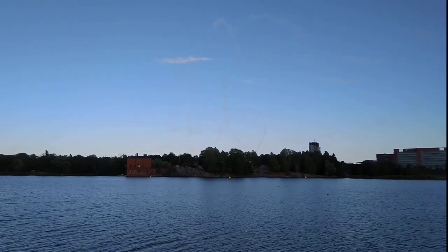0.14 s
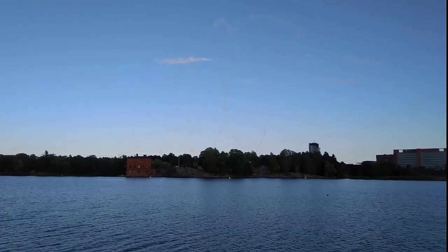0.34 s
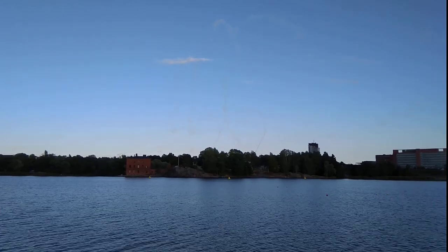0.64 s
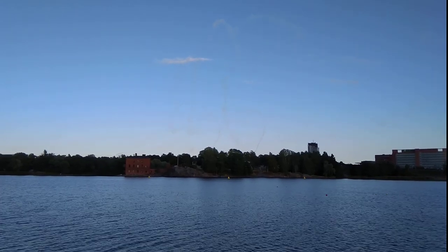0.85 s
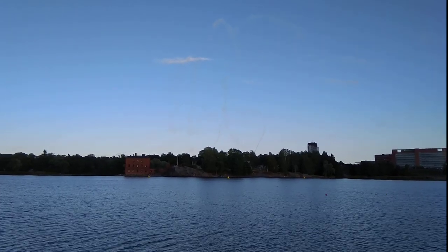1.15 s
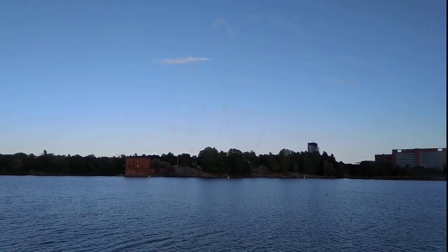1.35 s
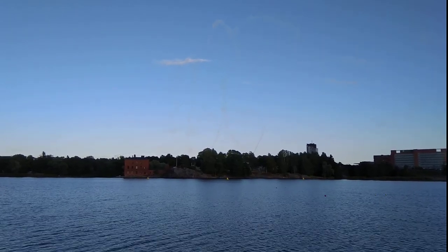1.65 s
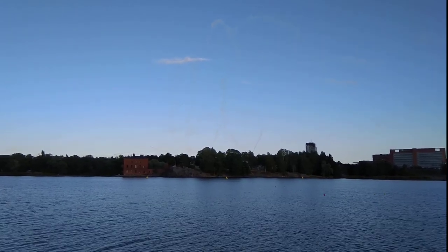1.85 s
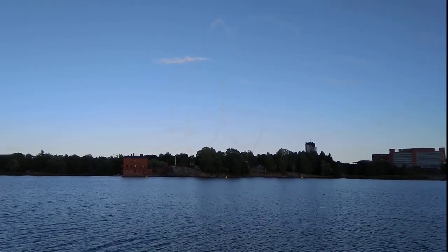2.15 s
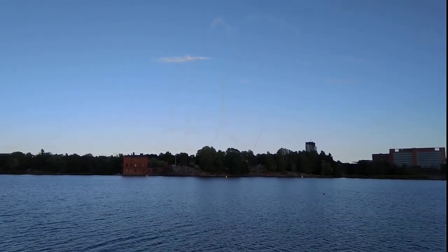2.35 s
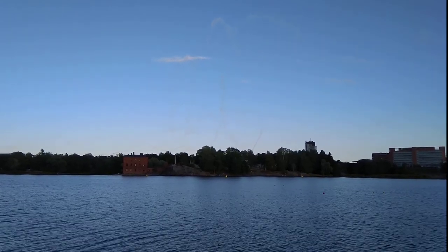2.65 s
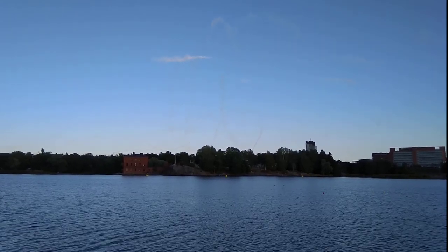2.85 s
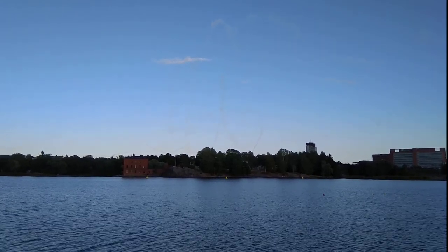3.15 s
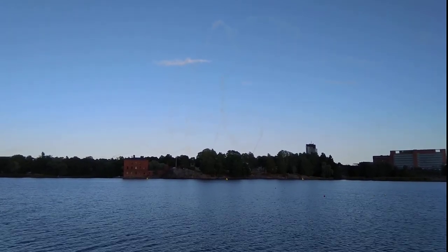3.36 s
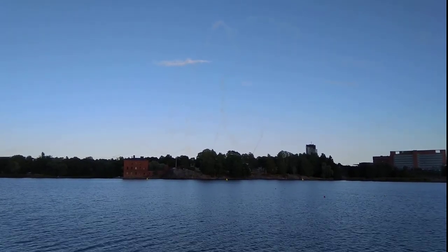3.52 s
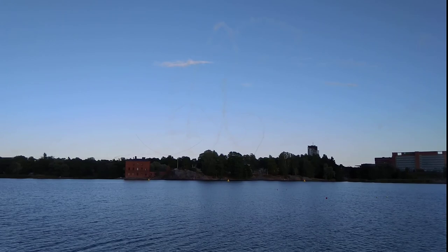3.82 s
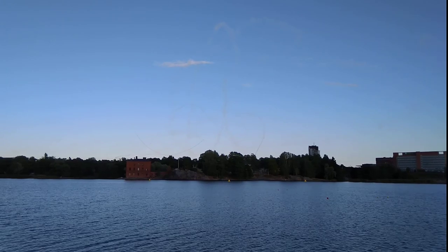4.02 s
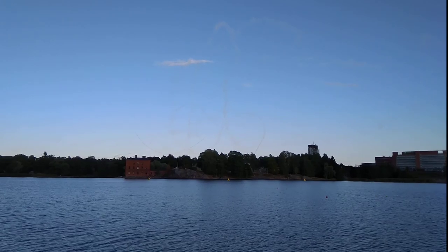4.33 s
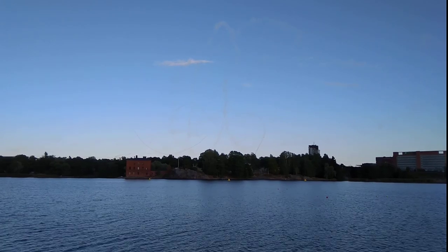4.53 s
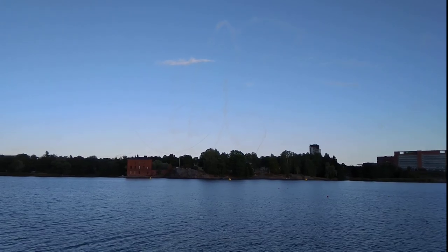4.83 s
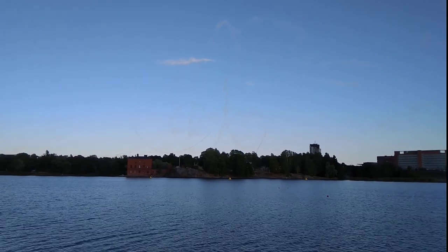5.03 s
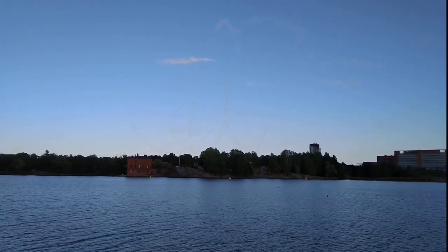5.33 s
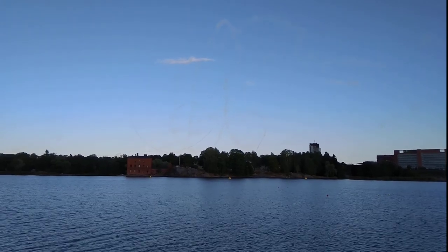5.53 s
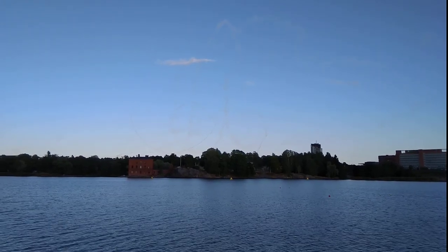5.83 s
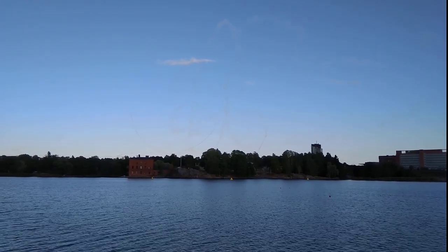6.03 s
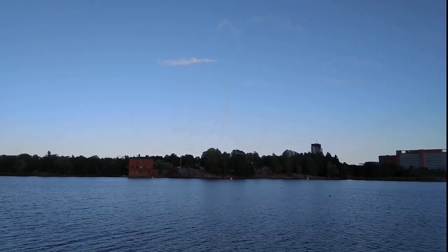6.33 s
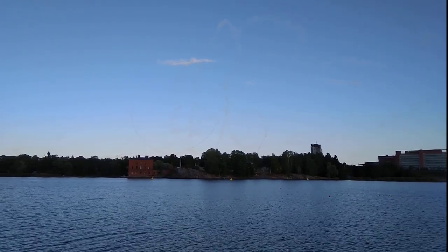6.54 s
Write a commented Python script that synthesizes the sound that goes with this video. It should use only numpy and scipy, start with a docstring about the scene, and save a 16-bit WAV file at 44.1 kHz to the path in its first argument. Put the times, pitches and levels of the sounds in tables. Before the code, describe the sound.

Small waves lap close by on a stony lake shore. For the first half second a fizzing wash swells and drains, with a quick cluster of sharp little slaps against the stones. Lighter laps and bubbly gurgles follow, with a round glug at about 1.4 seconds. From 1.8 to 3 seconds little waves fold over and splash again, the sharpest slap landing near 2 seconds. A few softer slaps come around 3.4 seconds, then the water calms. Tiny drips tick near 4 seconds, followed by two clear, hollow glugs at about 4.3 seconds. Another small splash arrives near 5 seconds, with bubbling around 5.5 seconds, and weak laps and trickles continue until the end at about 6.7 seconds. Underneath, a faint low rumble of traffic and a machine hum carry steadily from a town across the water.

```python
"""Small waves on a stony lake shore

A wash drains away, then weaker laps follow, each a swarm of tiny ringing bubbles and fizzing spray.
Crests slap the stones, little waves fold over, and trapped air gurgles and glugs in the gaps.
A distant town rumbles and hums across the water."""
import sys
import numpy as np
from scipy import signal
from scipy.fft import rfft, irfft, next_fast_len
from scipy.io import wavfile
from scipy.ndimage import uniform_filter1d, map_coordinates

SR = 44100
rng = np.random.default_rng(int(sys.argv[2]) if len(sys.argv) > 2 else 0)


def to_wav(s):
    """Save 16-bit WAV."""
    ch = np.atleast_2d(s).T  # columns
    pcm = np.round(np.clip(ch, -1, 1) * 32767)  # PCM
    wavfile.write(sys.argv[1], SR, pcm.astype(np.int16))


N = 294588


def amp(db):
    """Turn decibels (dB) into a number to multiply a sound by."""
    return 10 ** (np.asarray(db) / 20)


def unit(x):
    """Scale a sound to an average (rms) level of 1."""
    return x / np.sqrt(np.mean(x ** 2) + 1e-20)


def even(swarm):
    """Hold a sound's level near 1, smoothing out its slow ups and downs."""
    return swarm / np.sqrt(np.abs(uniform_filter1d(swarm ** 2, size=4000)) + 1e-6)


def curve(rows):
    """Join (seconds, value) points with straight lines, one value per sample."""
    return np.interp(np.arange(N) / SR, *np.transpose(rows))


def wobble(rate):
    """A smooth random curve through `rate` points a second."""
    return map_coordinates(rng.standard_normal(int(N * rate / SR) + 4), [np.arange(N) * rate / SR])


def swell(age, rise_s):
    """A rounded loudness shape that reaches 1 after rise_s seconds, then dies."""
    u = np.maximum(age, 0) / rise_s
    return (u * np.exp(1 - u)) ** 2


def filtered(x, response):
    """Multiply each frequency in x by response(hz)."""
    size = next_fast_len(N + SR // 2)
    return irfft(rfft(x, size) * response(np.fft.rfftfreq(size, 1 / SR)), size)[:N]


def coloured(x, points):
    """Shape the tone of x with (Hz, dB) points and bring it to level 1."""
    f, db = np.transpose(points)
    return unit(filtered(x, lambda hz: amp(np.interp(np.log(hz + 1), np.log(f), db))))


def patchy(x, depth_db):
    """Make small random patches of pitch and time louder or softer."""
    spectrum = signal.stft(x, nperseg=1024)[2]
    patches = uniform_filter1d(rng.standard_normal(spectrum.shape), size=5, axis=0)
    patches = uniform_filter1d(patches, size=7, axis=1)
    return signal.istft(spectrum * amp(depth_db * unit(patches)), nperseg=1024)[1][:N]


def stones(x, echo_db, echo_s):
    """Nearby stones add a short, dense echo that fades by 60 dB in echo_s seconds."""
    t = np.arange(SR // 8) / SR
    tail = rng.standard_normal(len(t)) * amp(-60 * t / echo_s) * (1 - np.exp(-t / 0.0031))
    return x + amp(echo_db) * signal.fftconvolve(x, tail / np.linalg.norm(tail))[:N]


def bubbles(starts, hz, cycles, spread_db, onset, size):
    """Each bubble rings for `size` samples: a fading tone that rises slightly in pitch."""
    age = np.arange(size) / SR * hz[:, None] / cycles  # reaches 1 after `cycles` vibrations
    strength = amp(spread_db * np.minimum(rng.exponential(size=(len(hz), 1)), 4))
    sign = rng.choice([-1, 1], (len(hz), 1))
    tone = np.sin(2 * np.pi * cycles * age * (1 + 0.011 * age))
    ring = tone * np.exp(-age) * (1 - np.exp(-age / onset)) ** 2
    places = starts[:, None] + np.arange(size)
    return unit(np.bincount(places.ravel(), (sign * strength * ring).ravel(), N + size)[:N])


def froth(low_hz, high_hz, cycles, spread_db, count, size):
    """A steady swarm of small bubbles and droplets within a range of pitches."""
    hz = low_hz * (high_hz / low_hz) ** rng.random(count)
    return bubbles(rng.integers(0, N, count), hz, cycles, spread_db, onset=0.062, size=size)


def flow():
    """Strength in dB of splash, wash and fizz: each lap swells and drains, over the fading foam."""
    # Foam left by the first wave. Each row: time in seconds, level in dB.
    foam = [(0.0, -40.5), (0.57, -46), (2.77, -52.5), (4.3, -59), (5.39, -63), (5.64, -67), (6.68, -68.5)]
    # The foam's splash, wash and fizz. Each row: dB above the foam, extra dB lost per dB it has faded.
    foam_sounds = [(-21, 1.5), (3, 0.5), (2, 0.16)]
    # Little waves running up the stones. Each row: crest time, run-up time and drain time in seconds,
    # then strength of splash, wash and fizz in dB.
    waves = [(0.03, 0.077, 0.22, -46, -35, -42), (0.16, 0.06, 0.13, -42.5, -31.5, -43),
             (0.375, 0.018, 0.086, -45, -35.5, -50), (0.539, 0.044, 0.07, -72, -41, -55),
             (0.72, 0.1, 0.15, -51.5, -40, -58), (1.375, 0.09, 0.075, -50, -38.5, -47.5),
             (1.77, 0.071, 0.071, -46.5, -46, -70), (1.88, 0.064, 0.15, -43.5, -42.5, -49),
             (2.07, 0.028, 0.14, -43.5, -44, -57.5), (2.39, 0.055, 0.094, -43.5, -40.5, -48),
             (2.51, 0.052, 0.068, -44.5, -44.5, -67), (2.72, 0.14, 0.2, -74, -46.5, -54),
             (2.89, 0.055, 0.069, -41.5, -41, -47), (3.08, 0.13, 0.51, -52, -47, -51.5),
             (3.419, 0.13, 0.13, -49.5, -49, -54), (3.62, 0.049, 0.088, -51, -52, -71),
             (3.94, 0.084, 0.1, -79, -43, -54.5), (4.0, 0.043, 0.046, -50, -61, -51.5),
             (4.19, 0.073, 0.19, -50.5, -46, -49), (4.755, 0.05, 0.094, -61, -52, -56.5),
             (4.97, 0.059, 0.086, -45, -46.5, -47), (5.12, 0.03, 0.077, -70, -51.5, -70),
             (5.38, 0.084, 0.14, -53.5, -49.5, -56.5), (5.75, 0.076, 0.1, -60.5, -59.5, -65),
             (5.96, 0.074, 0.062, -49.5, -50.5, -51.5), (6.21, 0.033, 0.08, -57, -85, -61.5),
             (6.35, 0.034, 0.16, -59, -66, -61), (6.49, 0.06, 0.097, -54.5, -56, -56)]
    t = np.arange(N) / SR
    foam_db = curve(foam)
    faded_db = np.maximum(-54 - foam_db, 0)  # -54 dB is a full blanket of foam
    power = np.array([amp(foam_db + db - loss * faded_db) ** 2 for db, loss in foam_sounds])
    for crest, run_up, drain, *levels_db in waves:
        rising = (np.minimum(t - crest, 0) / run_up) ** 2
        draining = (np.maximum(t - crest, 0) / drain) ** 1.1  # the last water drains fastest
        power += np.outer(amp(levels_db), np.exp(-rising - draining)) ** 2
    return 10 * np.log10(power)


def laps(splash_db, wash_db, fizz_db):
    """Strong water is a dense froth; as it slackens, single ringing bubbles take over."""
    # The tone of four layers of water. Each row: frequency in Hz, boost or cut in dB.
    splash_tone = [(250, -68), (600, -19), (1130, -16), (1450, 5), (2000, 3), (2450, 9), (3200, -36),
                   (6000, -55)]
    wash_tone = [(1000, -50), (1750, -0.5), (2000, 0), (2400, -2.5), (3100, 2), (4300, 3), (6000, -9.5),
                 (9000, -62)]
    fizz_tone = [(2000, -23), (3400, -10.5), (4200, -3.5), (4600, -2.5), (5400, -5), (6600, -5),
                 (8200, -19), (12000, -36)]
    spray_tone = [(4000, -15), (7000, 1.5), (8500, -1.5), (11000, -2.5), (15800, -4.5)]
    # How the finest spray thins as foam bursts. Each row: time in seconds, loss in dB.
    spray_loss = [(0, 3.5), (2.8, -0.5), (3.7, 4), (4.25, 2), (5.0, 8.5), (6.3, 4.5)]

    def blend(tone, thick, thin, froth_db):
        """Mix froth and single bubbles, half and half when the wash is at froth_db."""
        share = 1 / (1 + amp(froth_db - wash_db) ** 2)
        dense = even(coloured(patchy(thick, depth_db=2), tone))
        sparse = even(coloured(patchy(stones(thin, echo_db=4, echo_s=0.11), depth_db=3.8), tone))
        return np.sqrt(share) * dense + np.sqrt(1 - share) * sparse

    thick = froth(290, 3170, cycles=4.5, spread_db=5, count=9000, size=700)
    thin = froth(293.6, 3055, cycles=15, spread_db=3, count=1800, size=1500)
    splash = blend(splash_tone, thick, thin, froth_db=-45)
    thick = froth(2070, 3930, cycles=1.28, spread_db=3, count=20000, size=160)
    thin = froth(1868, 5110, cycles=12, spread_db=2.8, count=3500, size=1000)
    wash = blend(wash_tone, thick, thin, froth_db=-53)
    fizz = froth(2980, 9240, cycles=2.4, spread_db=4, count=12000, size=100)
    fizz += amp(8) * rng.standard_normal(N)
    spray = froth(9000, 14200, cycles=1, spread_db=5, count=3000, size=60)
    spray += amp(8.5) * rng.standard_normal(N)
    spray_db = -58.5 + 0.98 * (fizz_db + 51) - curve(spray_loss) + 0.85 * wobble(30)
    return (amp(splash_db) * splash + amp(wash_db - 1.5) * wash
            + amp(fizz_db - 4) * even(coloured(patchy(fizz, depth_db=1.5), fizz_tone))
            + amp(spray_db) * coloured(patchy(spray, depth_db=1.5), spray_tone))


def hollows(water, wash_db, depth_db=5):
    """Ebbing water bares hollows between the stones: some colour its tone steadily, others shift."""
    # The steady hollows. Each row: pitch in Hz, half width in Hz, boost or cut in dB.
    cavities = [(1310, 56, 5), (1840, 124, -3.5), (2000, 55, 3.5)]

    def colour(hz):
        return amp(sum(db * np.exp(-((hz - centre) / width) ** 2) for centre, width, db in cavities))

    bare = 1 / (1 + amp(wash_db + 45) ** 2)  # half bare when the wash is at -45 dB
    patch_gain = np.exp((depth_db * np.log(10) / 20) ** 2)  # level that the patches add on average
    return (1 - bare) * water + bare * patchy(filtered(water, colour), depth_db) / patch_gain


def bubbling(start, length, pitch_hz, scatter, count):
    """A run of softly starting bubbles, scattered around a pitch that sinks a little."""
    progress = (np.arange(count) + rng.random(count)) / count
    starts = np.clip((start + length * progress) * SR, 0, N - 1).astype(int)
    hz = pitch_hz * (1 - 0.019 * (progress - 0.5)) * np.exp(scatter * rng.standard_normal(count))
    return even(bubbles(starts, hz, cycles=3.6, spread_db=2.2, onset=0.7, size=1800))


def gurgle(fill_s=0.027, empty_s=0.085):
    """Each gap between stones fills and empties, bubbling at its own pitch, over an unbroken trickle whose
    level wavers."""
    # Water filling a gap. Each row: start and length in seconds, level in dB, pitch in Hz.
    fills = [(0.0, 0.14, -48, 801), (0.534, 0.06, -47, 1126), (0.703, 0.26, -58.5, 820),
             (1.14, 0.12, -43.5, 860), (1.333, 0.22, -46, 846), (1.379, 0.2, -46, 727),
             (1.851, 0.14, -47.5, 1220), (2.001, 0.22, -45.5, 774), (2.183, 0.37, -44.5, 761),
             (2.56, 0.12, -48, 905), (2.811, 0.19, -46, 770), (2.939, 0.2, -47.5, 1025),
             (3.03, 0.25, -47.5, 725), (3.533, 0.18, -54.5, 1064), (3.686, 0.19, -56, 916),
             (3.951, 0.24, -55, 1008), (4.221, 0.32, -51, 790), (4.624, 0.3, -52.5, 884),
             (4.96, 0.22, -53, 1010), (5.127, 0.13, -50.5, 1400), (5.261, 0.14, -50, 2010),
             (5.349, 0.14, -49.5, 1010), (5.362, 0.32, -53, 1280), (5.689, 0.2, -59.5, 682),
             (6.247, 0.23, -56.5, 704), (6.549, 0.26, -46, 738), (6.552, 0.18, -53, 1104)]
    # What the gaps let ring. Each row: frequency in Hz, boost or cut in dB.
    gap_tone = [(430, -36), (560, -9.5), (650, 1), (2200, -2)]
    t = np.arange(N) / SR
    trickle_db = -62 + 2.5 * wobble(12)
    out = amp(trickle_db) * bubbling(0, t[-1], pitch_hz=1017, scatter=0.197, count=900)
    for start, length, db, hz in fills:
        fade = np.clip(np.minimum((t - start) / fill_s, (start + length - t) / empty_s), 0, 1)
        out += amp(db) * fade * bubbling(start, length, hz, scatter=0.115, count=48)
    return np.std(out) * coloured(out, gap_tone)


def town():
    """Far traffic rumbles and machines give a fluttering hum; both slowly ease."""
    # The traffic's tone. Each row: frequency in Hz, boost or cut in dB.
    traffic_tone = [(20, -19), (32, -16), (55, 2.5), (100, 1.5), (260, -4.5), (450, -8.5), (1500, -14.5),
                    (3000, -48), (15000, -58)]
    # Machine hums. Each row: pitch in Hz, level in dB before the easing, width of the flutter in Hz.
    machines = [(75.5, -68.5, 13), (123.2, -62.5, 11)]
    t = np.arange(N) / SR
    out = amp(-60) * coloured(rng.standard_normal(N), traffic_tone)
    for hz, db, width in machines:
        flutter = 1.07 + wobble(2 * width) + 1j * wobble(2 * width)  # shakes both level and pitch
        out += amp(db) * unit(np.real(flutter * np.exp(2j * np.pi * hz * t)))
    return amp(1.5 - 0.09 * t) * out


def droplets(fizz_db):
    """Spray falls back in tiny ticks, louder when the fizz is strong; a few drops land close by."""
    # The close drops. Each row: start in seconds, peak level in dB, pitch in Hz.
    drops = [(0.038, -30, 13400), (0.8125, -39, 10400), (1.6794, -35, 14500), (2.857, -35, 11900),
             (3.899, -35, 5550), (4.007, -38, 5730), (4.034, -34.5, 5750), (4.259, -43, 12500),
             (4.29, -43, 12500), (4.356, -38, 5030)]
    ticks = froth(2400, 8000, cycles=1.3, spread_db=1.5, count=200, size=200)
    near, t = np.zeros(N + SR), np.arange(SR // 100) / SR
    for start, db, hz in drops:
        near[round(start * SR):][:len(t)] += amp(db) * np.sin(2 * np.pi * hz * t) * swell(t, 0.0003)
    return stones(amp(fizz_db - 13.5) * ticks + near[:N], echo_db=-5, echo_s=0.03)


def glugs():
    """A large air pocket pinches off, swells for a few vibrations and dies as its pitch rises."""
    # Each row: start in seconds, starting pitch in Hz, peak level in dB.
    big_bubbles = [(0.055, 1364, -37.5), (0.139, 897, -41), (0.323, 433, -45), (0.365, 525, -46.5),
                   (0.725, 694, -46), (1.04, 798, -42.5), (1.415, 763, -34), (1.741, 332, -52),
                   (2.003, 786, -41), (2.09, 793, -34), (2.265, 802, -38.5), (2.575, 890, -40),
                   (2.579, 490, -57), (3.458, 868, -40), (3.959, 1025, -38.5), (4.253, 677, -31.5),
                   (4.278, 408, -42.5), (4.394, 660, -33), (4.752, 870, -38.5), (5.493, 1216, -36.5),
                   (5.555, 1226, -38.5), (5.604, 1220, -41), (5.742, 707, -39.5), (6.186, 407, -53),
                   (6.327, 352, -46.5)]
    out, t = np.zeros(N + SR), np.arange(SR // 10) / SR
    for start, hz, db in big_bubbles:
        ring = np.sin(2 * np.pi * hz * t * (1 + 1.36 * t))
        out[round(start * SR):][:len(t)] += amp(db) * ring * swell(t, rise_s=0.0073)
    return stones(out[:N], echo_db=-12, echo_s=0.16)


def slaps():
    """A crest closes on a stone: a short round pop, then trapped air rings lower and water spatters."""
    # Each row: start in seconds, peak level in dB, base pitch in Hz, boost of air and spatter in dB.
    crests = [(0.072, -19, 3300, -9), (0.1354, -18.5, 2880, -16), (0.141, -19, 2900, -10),
              (0.162, -16, 2950, -20), (0.234, -20.5, 2780, -4), (0.2394, -23.5, 1890, -6),
              (0.2532, -19, 2560, -3.5), (0.3053, -17, 2820, -4), (0.3217, -15.5, 2570, -8.5),
              (0.3596, -17, 1690, -6), (0.390, -28, 1800, -4), (0.421, -23, 1860, -13),
              (0.529, -23.5, 2720, 4), (0.865, -26.5, 2800, -3), (0.889, -30.5, 1970, -3),
              (0.962, -31.5, 3080, -4), (1.357, -24, 3130, -3), (1.380, -31, 3500, -1),
              (1.395, -23.5, 2300, -7), (1.849, -18, 3470, -8), (1.902, -24, 2540, 4),
              (1.9634, -11.5, 2280, -5), (1.9986, -15, 2350, -5.5), (2.055, -18, 2520, -1),
              (2.1, -25, 2380, -2), (2.352, -26.5, 3360, -6), (2.421, -28, 2680, -2),
              (2.5158, -28, 2150, -17), (2.792, -31, 2800, -3), (2.856, -20, 2140, -7),
              (2.911, -23, 2310, 9), (3.030, -29.5, 3140, -7), (3.355, -35, 3150, -9),
              (3.409, -24.5, 2000, -11), (3.428, -31.5, 1820, -10), (3.434, -26.5, 3020, -9),
              (3.469, -29.5, 3170, -17), (4.9392, -32, 2240, -1), (4.9714, -27.5, 1810, 5),
              (5.359, -34, 3200, -11), (5.915, -33.5, 3130, -8)]
    # Air pockets that ring after a slap. Each row: typical delay in seconds, share of the base pitch,
    # relative level in dB, rise time in seconds.
    pockets = [(.0005, 0.788, -4, 0.0012), (.0027, 0.727, -9, 0.001)]

    def pop(age, hz, rise_s):
        return np.sin(2 * np.pi * hz * age) * swell(age, rise_s)

    out, t = np.zeros(N + SR), np.arange(SR // 30) / SR
    spatter_band = signal.butter(2, [1500, 4500], "band", fs=SR)
    for start, db, hz, air_db in crests:
        air = sum(amp(level) * pop(t - delay * rng.uniform(0.8, 1.2), hz * share, rise_s)
                  for delay, share, level, rise_s in pockets)
        spatter = signal.lfilter(*spatter_band, rng.standard_normal(len(t))) * amp(-60 * t / 0.024)
        hit = pop(t, hz * 1.12, rise_s=0.00047) + amp(air_db) * (air + spatter)
        out[round(start * SR):][:len(t)] += amp(db) * hit / np.abs(hit).max()
    return stones(out[:N], echo_db=-11, echo_s=0.02)


def plunges():
    """A little wave folds over, traps a cloud of like-sized bubbles and throws some spray."""
    # Each row: start in seconds, level at its loudest in dB, pitch in Hz, rise time in seconds.
    folding_waves = [(0.292, -43, 1210, 0.024), (0.357, -41, 1250, 0.02), (1.845, -39.5, 1400, 0.019),
                     (1.885, -37, 1747, 0.021), (1.983, -37.5, 1660, 0.02), (2.849, -37, 2270, 0.0081),
                     (2.899, -33, 2160, 0.0092), (3.576, -46.5, 1570, 0.019), (4.72, -52, 2780, 0.037),
                     (4.939, -38, 1850, 0.028), (5.92, -51, 2620, 0.04)]
    out, t = np.zeros(N + SR), np.arange(SR // 4) / SR
    cloud = froth(792, 5360, cycles=6.3, spread_db=0.5, count=14000, size=500)
    for start, db, hz, rise_s in folding_waves:
        first = round(start * SR)
        tone = [(hz * 0.5, -32), (hz * 0.8, -4), (hz, 0), (hz * 1.8, -10), (hz * 4, -20)]
        body = coloured(cloud, tone)[first:][:len(t)]
        spray = amp(-26) * rng.standard_normal(len(t))
        out[first:][:len(t)] += amp(db) * (body + spray) * swell(t, rise_s)
    return out[:N]


def scene():
    """The shore close by and the town behind it, in one channel."""
    splash_db, wash_db, fizz_db = flow()
    water = hollows(laps(splash_db, wash_db, fizz_db), wash_db) + plunges()
    return (water + slaps() + droplets(fizz_db) + gurgle() + glugs() + town())[None]


def record(dry):
    """Cut off the very highest treble."""
    return filtered(dry[0], lambda hz: hz < 15850)[None]


dry = scene()
out = record(dry)
to_wav(out)
```